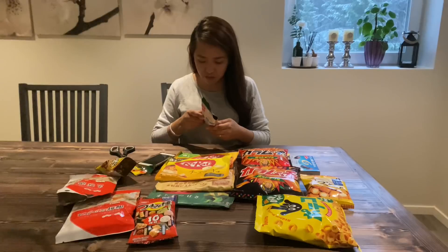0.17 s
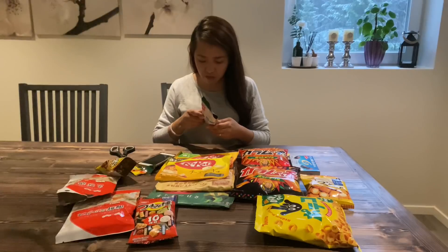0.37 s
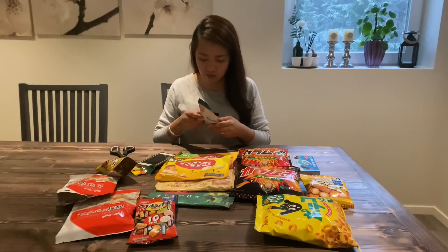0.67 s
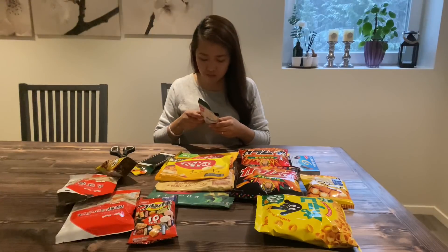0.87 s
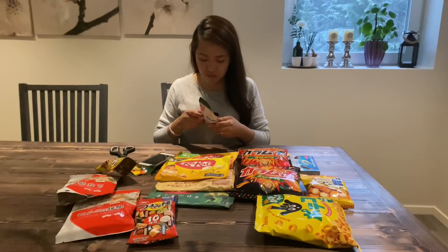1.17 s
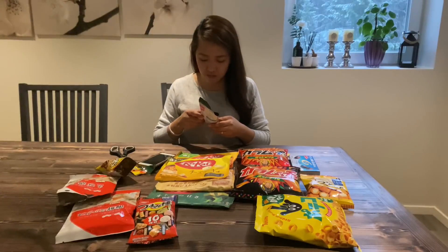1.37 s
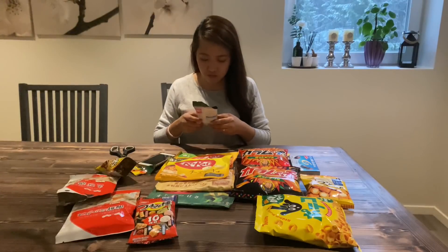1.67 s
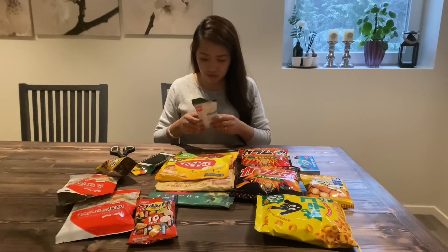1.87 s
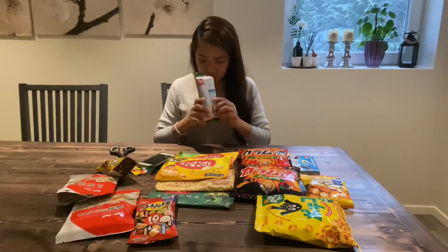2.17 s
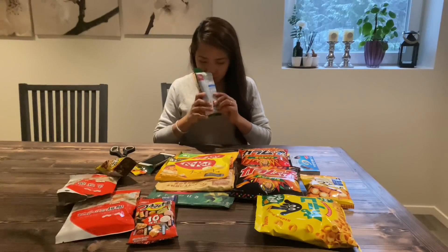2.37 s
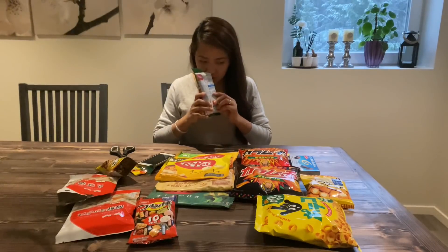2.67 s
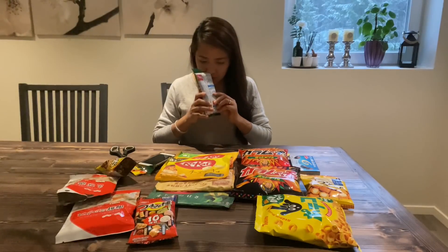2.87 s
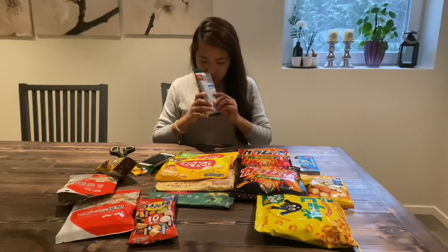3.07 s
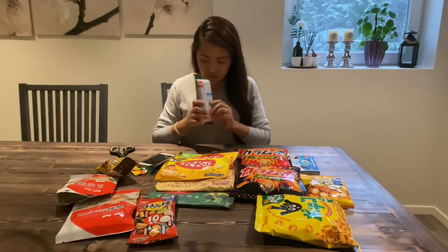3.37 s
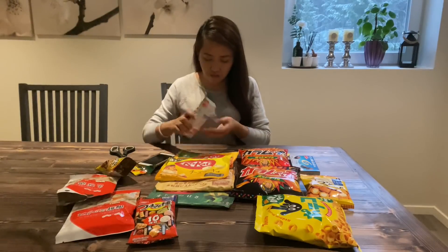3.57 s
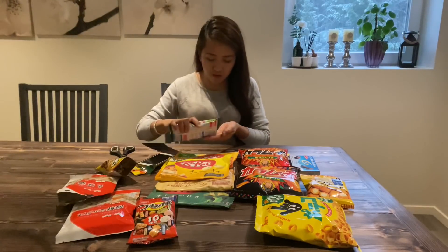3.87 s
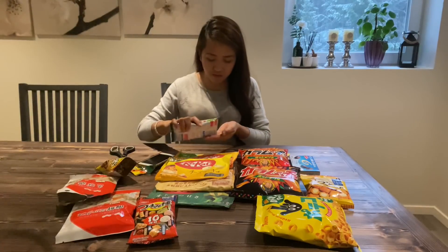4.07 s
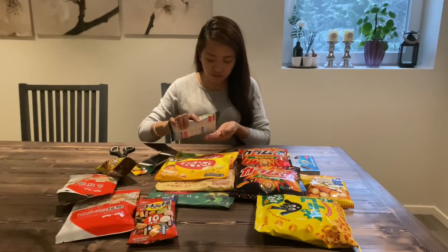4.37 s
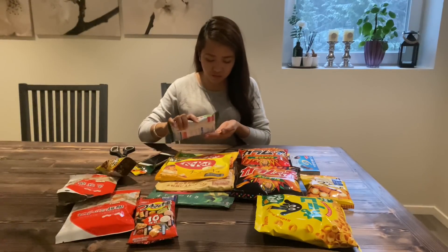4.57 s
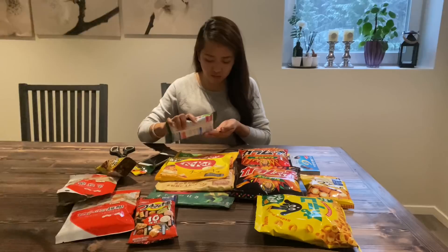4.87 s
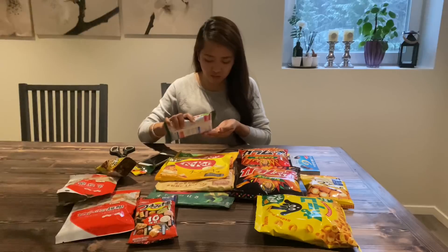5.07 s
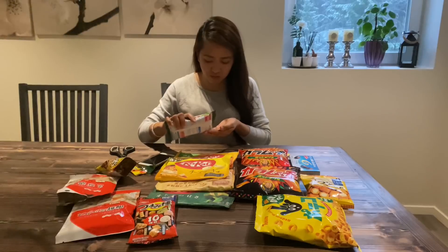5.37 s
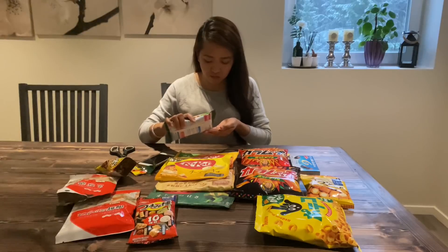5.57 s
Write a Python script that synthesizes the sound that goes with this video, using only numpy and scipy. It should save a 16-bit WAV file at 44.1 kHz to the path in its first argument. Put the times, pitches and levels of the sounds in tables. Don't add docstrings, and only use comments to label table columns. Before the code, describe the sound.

In a quiet, bare dining room, a small plastic packet gives a few faint crinkles, then a dull, soft thump sounds on a wooden table. After a sharper crackle and a near-silent gap, the packet is turned and shaken with snapping creases, rustling film and rattling dry pieces until almost the end. A stereo phone about two metres away picks up low room rumble and close wall reflections.

```python
import sys
import numpy as np
from scipy import signal
from scipy.fft import rfft, irfft, next_fast_len
from scipy.io import wavfile
from scipy.ndimage import map_coordinates

SR = 44100
rng = np.random.default_rng(int(sys.argv[2]) if len(sys.argv) > 2 else 0)


def file_out(sig):
    cols = np.atleast_2d(sig).T
    lim = np.clip(cols, -1, 1)
    pcm = np.round(lim * 32767).astype(np.int16)
    wavfile.write(sys.argv[1], SR, pcm)


def decibels_to_gain(level_db):
    exponent = np.asarray(level_db, float) / 20
    return 10 ** exponent


N = 252252

# (frequency [Hz], density [dB per Hz])
HUSH_SPECTRUM = [(15, -39), (25, -9), (54, 2.5), (107, -19), (150, -15), (371, -16.5), (1300, -33),
                 (13900, -50.5)]
# (frequency [Hz], likeness [0..1])
HUSH_LIKENESS = [(60, 0.77), (200, 0.14), (800, 0.046), (3000, 0.12), (7000, 0.84)]
# (frequency [Hz], t60 [s])
ROOM_T60 = [(150, 0.54), (500, 0.43), (1400, 0.38), (4000, 0.41), (10000, 0.24)]
# (frequency [Hz], likeness [0..1])
ROOM_LIKENESS = [(100, 1), (400, 0.43), (1000, 0.089), (4000, 0.12), (6500, 0.19), (8000, 1), (12000, 0.87)]
# (delay [s], level [dB])
WALL_ECHOES = [(.0046, -3), (.0082, -24.5), (0.0106, -11.5), (0.02, -12), (0.022, -14.5)]
# (frequency [Hz], gain [dB])
MIC_RESPONSE = [(25, -6), (60, 1), (1000, 3.5), (6500, 4.5), (11000, 5), (13000, 10), (13800, -0.5),
                (16500, -13)]
# (frequency [Hz], left lead [rad])
PORT_PHASE = [(60, 0.2), (9000, 0.5), (10300, 0.04), (11300, 1.5), (14000, 2.5)]
# (time [s], peak [dB], boards [dB re peak], hard knock [dB re boards])
BUMPS = [(0.172, -45.5, -9.5, -20), (0.267, -54.5, -5, -11), (0.564, -56, 6, -7.5), (0.935, -52, 7.5, -9),
         (0.954, -31, -4, -12.5), (1.141, -43.5, 11.5, 1), (1.149, -21.5, 3.5, -6),
         (1.469, -45.5, -10.5, -7), (1.959, -52.5, -14, -10), (2.682, -45, -4.5, -6),
         (2.808, -53.5, -4, -0.5), (3.562, -60, -6, 5), (3.689, -57.5, 2.5, 10.5), (4.335, -45, -8.5, -4)]
# (frequency [Hz], level [dB], t60 [s], build-up [s])
FLOOR_MODES = [(47.1, -11, 0.48, 0.027), (60.17, -1.5, 0.57, 0.037), (66.27, 2, 0.44, 0.046),
               (92.3, 5.5, 0.14, 0.019), (117.7, -1, 0.41, 0.13)]
# (frequency [Hz], level [dB], t60 [s], build-up [s])
BOARD_MODES = [(140, -14, .5, .02), (160, -2, .25, .018), (170, -8, .42, .03), (226, -4, .44, .04),
               (250, 1, .16, .014)]
# (frequency [Hz], level [dB], t60 [s], build-up [s])
TABLE_MODES = [(301, -26.5, 0.12, 0.0088), (369.5, -18.5, 0.23, 0.009), (524, -21, 0.35, 0.0062)]
# (frequency [Hz], level [dB])
SCUFFLE_SPECTRUM = [(200, -15.5), (300, 4.5), (350, -3.5), (520, -9.5), (750, -24), (1100, -37.5),
                    (1600, -58.5), (3000, -47), (6000, -69)]
# (time [s], peak [dB], pitch [Hz])
POPS = [(0.055, -53.5, 960), (0.486, -39.5, 624), (1.551, -57, 890), (1.791, -45.5, 819), (1.861, -39, 269),
        (1.918, -36, 500), (1.973, -52, 474), (2.049, -47.5, 440), (2.098, -48, 283), (3.366, -42, 895),
        (3.423, -37, 573), (3.688, -45.5, 230), (3.827, -40.5, 465), (3.958, -44.5, 410), (4.112, -41, 418),
        (4.132, -40, 460), (4.422, -41, 501), (4.469, -43, 228), (4.655, -38, 820), (4.674, -35.5, 500),
        (4.824, -47, 407), (4.837, -41.5, 385), (4.878, -38, 263), (4.902, -50, 490), (5.166, -45, 950),
        (5.244, -49, 519), (5.324, -34, 434), (5.336, -36, 616), (5.359, -46, 530), (5.677, -49.5, 487)]
# (time [s], peak [dB])
TICKS = [(0.4413, -52), (1.8436, -65), (1.859, -34.5), (2.051, -52), (3.3613, -56), (3.376, -42),
         (3.4242, -42), (3.4363, -34), (3.6631, -50.5), (3.835, -37), (3.8678, -45), (3.8906, -41),
         (3.9482, -45), (3.976, -42), (4.0534, -47), (4.088, -47), (4.12, -45), (4.1605, -35),
         (4.3156, -54), (4.4222, -36), (4.6554, -35.5), (4.818, -34), (4.8294, -40), (4.8736, -35),
         (4.9817, -42.5), (5.135, -47), (5.1482, -33), (5.2791, -35.5), (5.3255, -29), (5.616, -58.5)]
# (time [s], peak [dB], ring [Hz], bright crack
# [dB re peak])
SNAPS = [(.024, -57.5, 1530, 0), (.0527, -47.5, 1510, -5), (.2944, -57.5, 2170, 3),
         (.4419, -31, 1910, -0.5), (.487, -44, 2390, -11), (1.4897, -42, 2890, -10.5),
         (1.5275, -47.5, 1770, -15), (1.55, -57, 2500, -13), (1.7916, -46, 2300, -21),
         (1.8581, -27, 2040, -3.5), (1.919, -38.5, 2230, -19), (1.9974, -58, 1020, 13),
         (2.0287, -51, 1400, -19), (2.0507, -48.5, 1930, 8), (2.1779, -48.5, 1550, 2.5),
         (2.2348, -57, 1060, -22), (2.5865, -66, 1235, -18), (3.2796, -63.5, 1188, -9),
         (3.3264, -48.5, 1100, -29), (3.362, -39, 2000, 7.5), (3.3674, -37.5, 1080, 2),
         (3.3777, -33, 2100, -1), (3.4191, -33.5, 1770, -6), (3.423, -36.5, 1110, 9.5),
         (3.438, -23.5, 2080, 2.5),
         (3.661, -54, 2230, 2), (3.7184, -49, 1050, -20), (3.785, -46, 2240, -22),
               (3.8191, -34.5, 2700, -29), (3.8283, -28, 2300, -40), (3.8476, -34.5, 1130, -18),
               (3.9558, -35, 1470, -2.5), (4.0526, -28.5, 1187, -6), (4.3166, -49.5, 1150, 3),
               (4.4014, -61, 1510, -8), (4.4228, -39, 1140, 5), (4.535, -44, 1960, -6),
               (4.6074, -35, 1990, -3), (4.657, -30.5, 2160, 0.5), (4.6792, -35.5, 1370, -23),
               (4.8163, -45, 1450, -13), (4.8245, -36.5, 1160, 3.5), (4.8764, -30.5, 2300, 8.5),
               (4.9047, -39, 1040, -17), (4.9794, -38.5, 2660, 4.5), (5.034, -37, 1150, -25),
               (5.1378, -56, 1080, 2), (5.241, -43, 1070, -4), (5.2767, -45.5, 930, 4),
               (5.31, -36, 2300, -10), (5.3207, -30.5, 1040, -1), (5.329, -27, 2440, -17),
               (5.341, -28.5, 2350, -20), (5.3545, -28.5, 970, -29), (5.679, -44.5, 1140, -25)]
# (time [s], strength [dB], t60 [s], hollow body [dB re film], dry rattle [dB re film])
GESTURES = [(0.056, -61, 0.2, -5.5, -20.5), (0.447, -63, 0.19, 2, -17), (0.483, -61, 0.38, 6.5, -28),
            (1.492, -66.5, .45, -5, -11.5), (1.535, -72.5, 0.2, 7, -2), (1.794, -66.5, 0.45, 7.5, -39),
            (1.861, -54.5, 0.43, 4, -0.5), (1.96, -63, 1.17, 2.5, -15), (2.605, -77, .2, 7, -17),
            (3.299, -73, .5, 0.5, -20), (3.37, -51, 0.68, -8, -15), (3.439, -51, 0.68, -4.5, -7),
            (3.671, -63, 2.3, 4, -8.5), (3.828, -50.5, 0.94, 2.5, -7.5), (4.055, -50, 1.02, -0.5, -9),
            (4.422, -56, 0.71, 3.5, -10.5), (4.61, -63, 0.8, -1, -16), (4.661, -48, 0.33, -2.5, -5.5),
            (4.822, -50.5, 0.95, -2, -9.5), (4.889, -59, 0.4, 6.5, -13), (5.15, -60, 0.73, 4, 0.5),
            (5.282, -59.5, 0.51, 10.5, -1), (5.324, -44, 0.41, 0.5, -2.5), (5.679, -72, 0.74, 3, -5.5)]

HUSH_DB, RUMBLE_DB = -67, -78.5
STIR_DB, STIR_PER_BUMP_DB, STIR_RISE_S, STIR_T60_S = -65.5, 0.36, 0.1, 0.8
EDGE_DB, EDGE_PER_CRACK_DB, EDGE_SCATTER_DB = -14.5, 0.59, 7.5
TICK_HZ, TICK_SPREAD = 8150, 0.05
GRIP_DB_PER_S, GIVE_DB, JOLT_DB, JOLT_T60_S = 500, 3.5, 8, 0.059
BODY_LASTS, RATTLE_LASTS = 1.06, 0.97


def unit(x):
    return x / np.sqrt(np.mean(x ** 2) + 1e-20)


def along(points, hz):
    f, v = np.transpose(points)
    return np.interp(np.log(hz + 1), np.log(f + 1), v)


def filtered(x, response):
    m = next_fast_len(x.shape[-1] + 8192)
    spectrum = rfft(x, m) * response(np.fft.rfftfreq(m, 1 / SR))
    return irfft(spectrum, m)[..., :x.shape[-1]]


def paired(two, likeness):
    def mid_side(hz):
        turn = np.arccos(np.clip(along(likeness, hz), -1, 1)) / 2
        return np.array([np.cos(turn), np.sin(turn)])

    mid, side = filtered(two, mid_side)
    return np.array([mid + side, mid - side])


def rings(s, hz, cycles, gain, size, rise=0.1):
    t = np.arange(size) / SR
    turns = np.clip(hz, 30, 0.45 * SR)[:, None] * t
    envelope = decibels_to_gain(-60 * turns / cycles) * (1 - np.exp(-turns / rise))
    shape = gain[:, None] * np.sin(2 * np.pi * turns) * envelope
    at = np.round(s * SR).astype(int)[:, None] + np.arange(size)
    return np.bincount(at.ravel(), shape.ravel(), N + SR)[:N]


def swell(s, db, rise_db_per_s, t60, step_db=0):
    late = np.arange(0, N / SR, 0.001) - s[:, None]
    climb = rise_db_per_s * late - step_db
    decay = -60 * late / np.reshape(t60, (-1, 1))
    level = db[:, None] + np.where(late < 0, climb, decay)
    return np.interp(np.arange(N) / SR, late[0] + s[0], np.linalg.norm(decibels_to_gain(level), axis=0))


def hush():
    def house(hz):
        resonance = 1j * hz * 30 / (55 ** 2 - hz ** 2 + 1j * hz * 30)
        return resonance / (1 + (hz / 110) ** 4)

    tone = paired(rng.standard_normal((2, N)), HUSH_LIKENESS)
    tone = filtered(tone, lambda hz: decibels_to_gain(along(HUSH_SPECTRUM, hz)))
    rumble = filtered(paired(rng.standard_normal((2, N)), HUSH_LIKENESS), house)
    s, db = np.transpose(BUMPS)[:2]
    stir_db = STIR_DB + STIR_PER_BUMP_DB * (db - db.mean())
    stir = swell(s + STIR_RISE_S, stir_db, 20 / STIR_RISE_S, STIR_T60_S)
    return decibels_to_gain(HUSH_DB - 4) * unit(tone) + (decibels_to_gain(RUMBLE_DB) + stir) * unit(rumble)


def room(x, wet_db, count=19):
    step = N // count + 1
    out = np.zeros((2, N + 3 * step + SR))
    x = np.pad(x, (step, 2 * step))
    fade = np.sqrt(np.hanning(2 * step))
    for k in range(count + 1):
        hz, t, z = signal.stft(rng.standard_normal((2, 26000)), SR, nperseg=256)
        decay = decibels_to_gain(-60 * t / along(ROOM_T60, hz)[:, None])
        tail = paired(signal.istft(z * decay, SR, nperseg=256)[1], ROOM_LIKENESS)
        tail = tail * (1 - np.exp(-np.arange(tail.shape[1]) / SR / 0.0016))
        tail = decibels_to_gain(wet_db) * tail / np.linalg.norm(tail[0])
        for s, db in WALL_ECHOES:
            at = round(s * SR) + rng.integers(0, 4, 2)
            tail[[0, 1], at] += decibels_to_gain(db - 10.5 + rng.normal(0, 0.95, 2))
        wet = signal.fftconvolve(fade * x[None, k * step:(k + 2) * step], tail, axes=1)
        out[:, k * step:k * step + wet.shape[1]] += wet
    return out[:, step:step + N]


def bumps():
    out = np.zeros((2, N + SR))
    t = np.arange(SR // 2) / SR
    for s, db, boards_db, knock_db in BUMPS:
        start = round(s * SR)
        groups = [(FLOOR_MODES, db),
                  (BOARD_MODES, db + boards_db - 2.0),
                  (TABLE_MODES, db + boards_db + knock_db + 1.5)]
        for modes, group_db in groups:
            for hz, mode_db, t60, build_s in modes:
                grow = (1 - np.exp(-(t / build_s) ** 2)) * np.minimum(1, 10 * (t[-1] - t))
                waver = np.interp(t * 18, np.arange(40), rng.standard_normal(40))
                waver = waver * np.minimum(t / 0.1, 1)
                phase = rng.normal(0, hz / 700, (2, 1)) + 2.14 * waver
                level = decibels_to_gain(group_db + mode_db + 2.5 * waver - 60 * t / t60)
                out[:, start:start + len(t)] += level * np.sin(2 * np.pi * hz * t + phase) * grow
    return out[:, :N]


def knocks():
    out = np.zeros(N + SR)
    t = np.arange(2000) / SR
    envelope = t / 0.017 * np.exp(1 - t / 0.0094)
    for s, db, boards_db, knock_db in BUMPS:
        scuffle = envelope * rng.standard_normal(len(t))
        out[round(s * SR):][:len(t)] += decibels_to_gain(db + boards_db + knock_db) * scuffle
    return filtered(out[:N], lambda hz: decibels_to_gain(along(SCUFFLE_SPECTRUM, hz)))


def pops():
    s, db, hz = np.transpose(POPS)
    return rings(s, hz, 9.65, decibels_to_gain(db + 1.5), size=1400, rise=0.46)


def ticks():
    s, db = np.transpose(TICKS)
    hz = TICK_HZ * np.exp(TICK_SPREAD * rng.standard_normal(len(s)))
    return rings(s, hz, 23.0, decibels_to_gain(db + 1), size=250, rise=0.69)


def grains(count, hz, spread, cycles, scatter_db, size):
    s = rng.uniform(0, N / SR, count)
    clumps = map_coordinates(rng.standard_normal(400), [s * 45])
    db = scatter_db * np.minimum(rng.exponential(size=count), 3.5) + 3.5 * clumps
    pitch_hz = hz * np.exp(spread * rng.standard_normal(count))
    gain = decibels_to_gain(db) * rng.choice([-1, 1], count)
    return unit(rings(s, pitch_hz, cycles, gain, size, rise=0.54))


def rustle():
    film = grains(count=14000, hz=2300, spread=0.599, cycles=7.8, scatter_db=3.5, size=200)
    body = grains(count=3000, hz=413.5, spread=0.518, cycles=7.5, scatter_db=1, size=700)
    bits = grains(count=14000, hz=8200, spread=0.2, cycles=14, scatter_db=3, size=100)
    s, film_db, t60, body_db, rattle_db = np.transpose(GESTURES)

    def work(db, lasts):
        steady = swell(s, db - 7.5, GRIP_DB_PER_S, lasts * t60, GIVE_DB)
        jolt = swell(s, db - 11.0 + JOLT_DB, GRIP_DB_PER_S, JOLT_T60_S, GIVE_DB + JOLT_DB)
        return steady + jolt

    out = work(film_db, 0.95) * film
    out = out + work(film_db + body_db, BODY_LASTS) * body
    return out + work(film_db + rattle_db, RATTLE_LASTS) * bits


def snaps():
    s, db, hz, crack_db = np.transpose(SNAPS)
    edge_db = EDGE_DB + EDGE_PER_CRACK_DB * crack_db + EDGE_SCATTER_DB * rng.standard_normal(len(s))
    late = 0.0004 * np.abs(rng.standard_normal((len(s), 8)))
    out = rings(s, hz, 7.7, decibels_to_gain(db - 0.5), size=500, rise=0.39)
    for k, ratio in enumerate([0.7, 1.45]):
        out += rings(s + late[:, k], hz * ratio, 7.8, decibels_to_gain(db - 8.0), size=300, rise=0.23)
    for k, fold_hz in enumerate([3900, 4900, 6100]):
        gain = (-1) ** k * decibels_to_gain(db + crack_db - 2)
        out += rings(s + late[:, 2], fold_hz + 0 * s, 7.34, gain, size=200, rise=0.37)
    for k, edge_hz in enumerate([10000, 12000]):
        gain = (-1) ** k * decibels_to_gain(db + edge_db + 2.5)
        out += rings(s + late[:, 5], edge_hz + 0 * s, 15.0, gain, size=100, rise=1.0)
    return out


def scene():
    def small(hz):
        return (1j * hz / 190 / (1 + 1j * hz / 190)) ** 3

    packet = filtered(snaps() + pops() + ticks() + rustle(), small)
    knock = knocks()
    close = packet * decibels_to_gain([[0.4], [-0.4]]) + room(packet, wet_db=1.0)
    table = bumps() + knock + room(knock, wet_db=11.5, count=9)
    return close + table * decibels_to_gain([[1.4], [-1.4]]) + hush()


def low_pass(x):
    return signal.sosfilt(signal.butter(12, 16500, fs=SR, output="sos"), x)


def record(dry):
    def ports(hz):
        lead = np.outer([1, -1], along(PORT_PHASE, hz))
        return decibels_to_gain(along(MIC_RESPONSE, hz)) * np.exp(0.5j * lead)

    return low_pass(filtered(dry, ports))


dry = scene()
out = record(dry)
file_out(out)
```